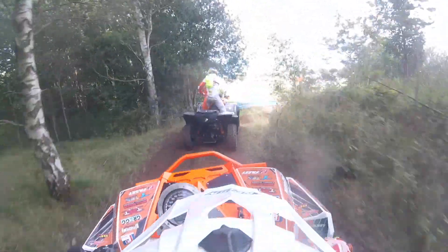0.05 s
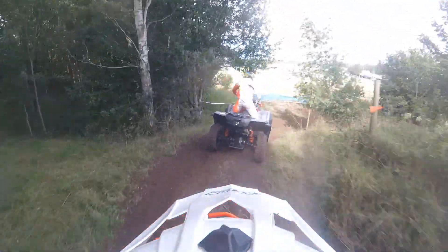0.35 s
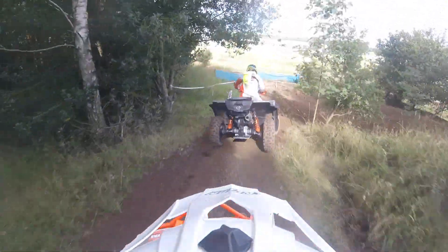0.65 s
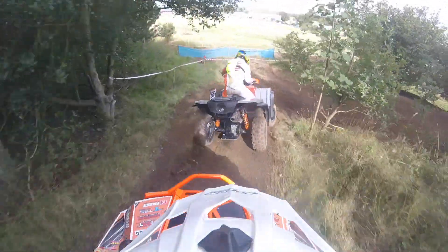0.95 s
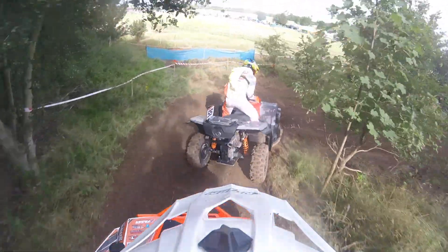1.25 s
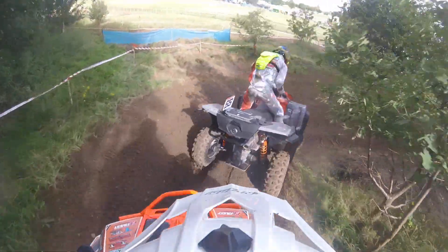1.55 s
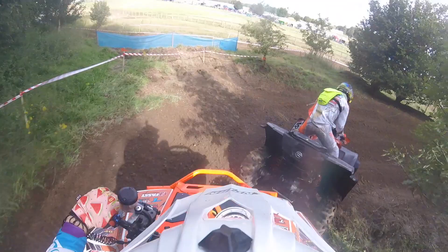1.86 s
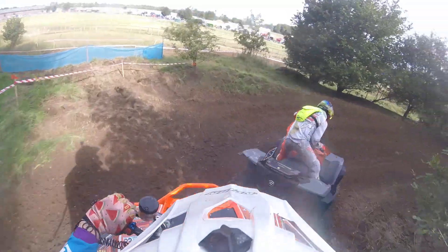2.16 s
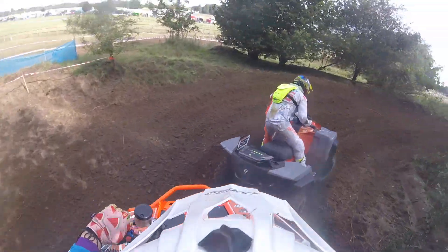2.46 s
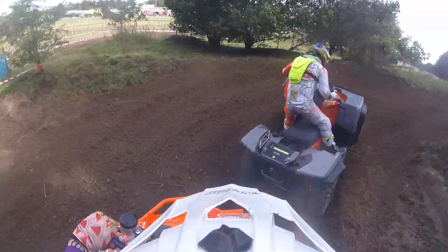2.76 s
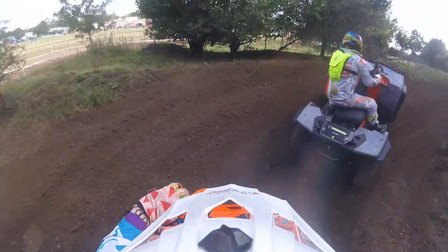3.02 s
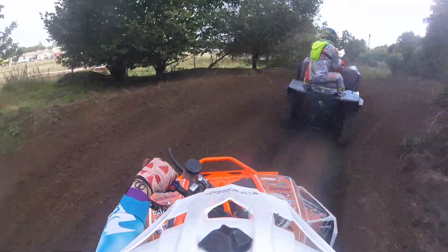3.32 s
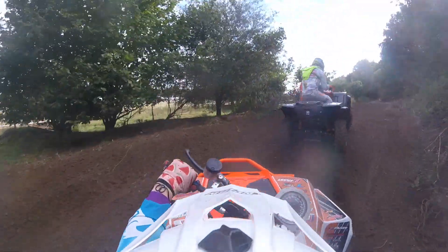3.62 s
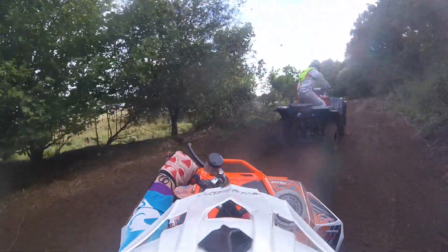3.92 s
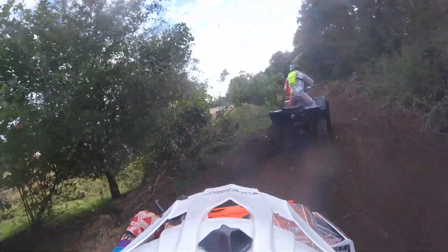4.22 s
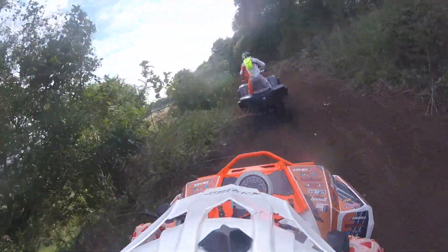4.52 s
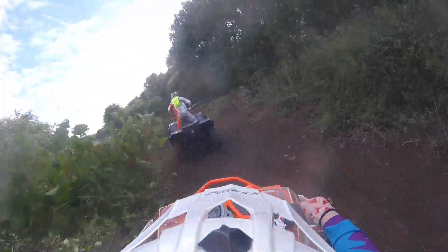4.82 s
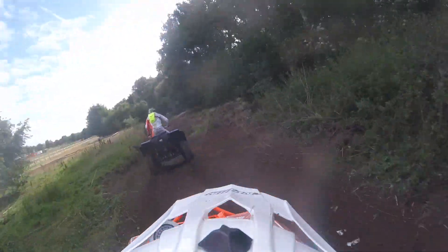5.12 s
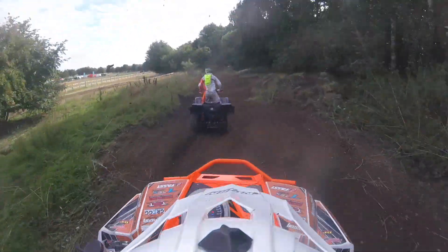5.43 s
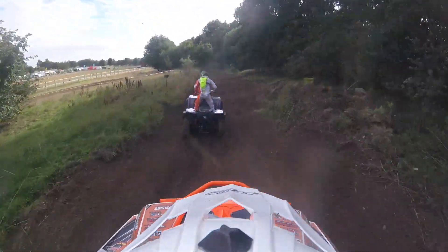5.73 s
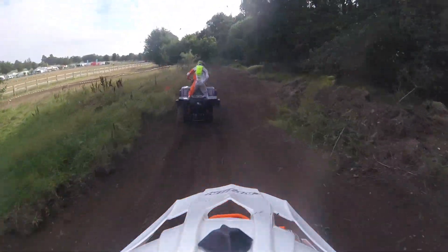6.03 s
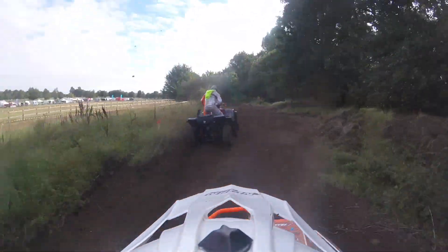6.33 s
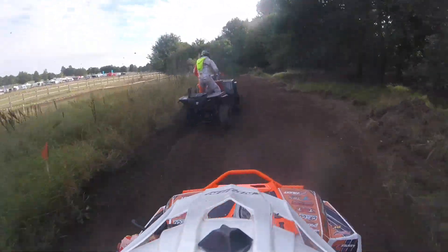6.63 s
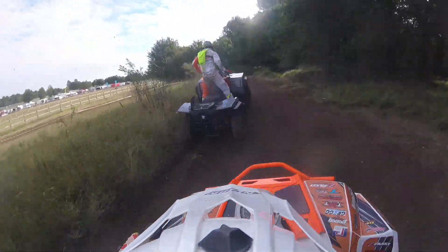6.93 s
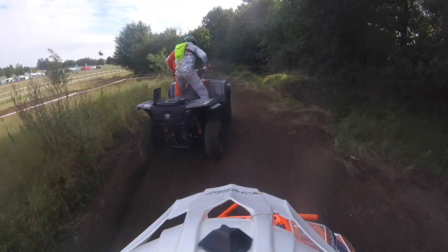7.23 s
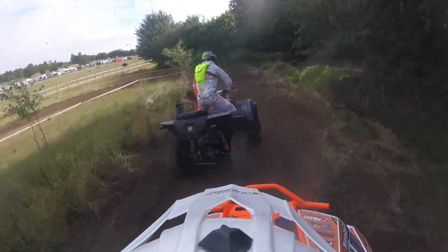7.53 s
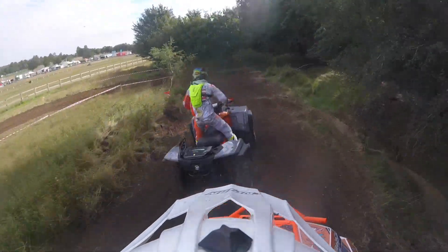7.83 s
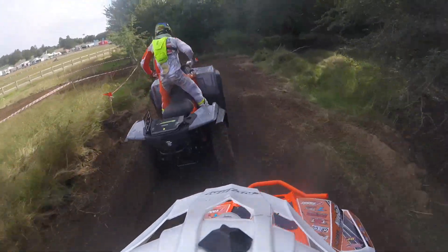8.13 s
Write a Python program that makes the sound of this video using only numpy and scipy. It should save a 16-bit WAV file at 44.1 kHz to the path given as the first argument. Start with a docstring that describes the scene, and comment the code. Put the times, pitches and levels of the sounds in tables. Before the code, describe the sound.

A quad bike's single-cylinder engine booms and rasps just below the rider's microphone on a dirt track, over low wind rumble and a hissy mechanical clatter. A faint gear whine fades at the very start. The engine revs briefly, then winds down from about 0.8 to 1.5 seconds as loose parts tick. Near 2 seconds the exhaust of a second quad just ahead sings a raspy rising note, then barks and roars loudly around 2.5 to 3 seconds. From 3 seconds the near engine holds a long pull, hardest around 4.5 seconds and growling at top speed near 6. From about 6 to 7.7 seconds the exhaust ahead cracks sharply and roars briefly again, while bumps clunk the chassis and tick loose parts. By 8 seconds the near engine has dropped to lower revs. The microphone's plastic housing makes everything slightly muffled, with a thin treble ring.

```python
"""A dirt track, from a camera microphone in a treble-ringing plastic housing on a quad bike's rider.
Over wind rumble and a brief gear whine, the single cylinder below booms and rasps, then winds down.
Near 2 s the tailpipe of a second quad just ahead sings, barks and roars. From 3 s the rider holds
a long pull, growling at top speed near 6 s. Then the pipe ahead cracks and roars again, bumps
clunk the chassis and tick loose parts, and by 8 s the near engine has dropped back."""
import sys
import numpy as np
from scipy import signal
from scipy.fft import rfft, irfft, next_fast_len
from scipy.io import wavfile
from scipy.ndimage import uniform_filter1d, map_coordinates

SR = 44100
rng = np.random.default_rng(int(sys.argv[2]) if len(sys.argv) > 2 else 0)


def waveform_to_disk(signal):
    """Save audio, clipped to [-1, 1], as 16-bit WAV at the path in sys.argv[1]."""
    frames = np.transpose(np.atleast_2d(signal))
    scaled = np.clip(frames, -1, 1) * 32767
    samples = np.round(scaled).astype(np.int16)
    wavfile.write(sys.argv[1], SR, samples)


N = 364707
TIME = np.arange(N) / SR


def amp(db):
    """Decibels to gain."""
    return 10 ** (np.asarray(db) / 20)


def unit(x):
    """Scale to rms 1."""
    return x / np.sqrt(np.mean(x ** 2) + 1e-20)


def steady(x, size=5000):
    """Hold the running rms at 1, whatever the pulse rate."""
    power = uniform_filter1d(uniform_filter1d(x * x, size), size)
    return x / np.sqrt(np.abs(power) + 1e-12)


def curve(rows):
    """Join (t/s, value) rows into one value per sample."""
    return np.interp(TIME, *np.transpose(rows))


def wobble(rate):
    """A smooth random curve, rate knots a second."""
    knots = rng.standard_normal(2048)
    coarse = TIME[::32]
    return np.interp(TIME, coarse, map_coordinates(knots, [coarse * rate], mode="wrap"))


def held(start, length, attack_s, release_s):
    """A gain that rises from start and dies away once its length is over."""
    age = TIME - start
    return np.clip(age / attack_s, 0, 1) * np.exp(-np.maximum(age - length, 0) / release_s)


def swells(rows, attack_s, release_s):
    """One gain curve per level column of (t/s, length/s, level/dB, ..) rows; the loudest row wins."""
    gains = 0
    for start, length, *db in rows:
        gains = np.maximum(gains, amp(db)[:, None] * held(start, length, attack_s, release_s))
    return gains


def ring(x, spectrum, size=8192):
    """Pass x through a minimum-phase body with the given (f/Hz, level/dB) response."""
    hz, db = np.transpose(spectrum)
    gain = amp(np.interp(np.log(np.fft.rfftfreq(size, 1 / SR) + 1), np.log(hz), db))
    cepstrum = irfft(np.log(gain))
    cepstrum[1:size // 2] *= 2
    cepstrum[size // 2 + 1:] = 0
    return signal.oaconvolve(x, irfft(np.exp(rfft(cepstrum))))[:N]


def pipe(x, round_trip_s, reflect):
    """Echoes between the ends of a pipe spread each pulse without colouring it."""
    size = next_fast_len(N + SR // 2)
    delay = np.exp(-2j * np.pi * np.fft.rfftfreq(size, 1 / SR) * round_trip_s)
    return irfft(rfft(x, size) * (delay - reflect) / (1 - reflect * delay), size)[:N]


def impulses(times, sizes):
    """Spikes of the given sizes at the given times."""
    return np.bincount(np.clip(np.round(times * SR).astype(int), 0, N), sizes, N + 1)[:N]


def firings(cycles, scatter_db, jitter_s):
    """One uneven pulse for each engine cycle."""
    times = np.interp(np.arange(np.ceil(cycles[0]), cycles[-1]), cycles, TIME)
    chance = rng.standard_normal((len(times), 2))
    return impulses(times + jitter_s * chance[:, 0], amp(scatter_db * chance[:, 1]))


def puffs(spikes, decay_s, click=0):
    """Each spike releases a dying puff of turbulence, led by an optional sharp click."""
    envelope = signal.lfilter([1], [1, -np.exp(-1 / (decay_s * SR))], spikes)
    return click * spikes + envelope * rng.standard_normal(N)


def orders(cycles, table, flutter_db, count=4):
    """Orders (multiples of the cycle rate), wavering in level, phased into count pulses a cycle."""
    tone = 0
    for k, db in table:
        phase = 2 * np.pi * k * cycles - np.pi * k * k / count
        tone += amp(db + flutter_db * wobble(12)) * np.cos(phase)
    return unit(tone)


# rumble at the microphone: f/Hz, level/dB
RUMBLE_SPECTRUM = [(10, -26.5), (25, -18), (45, -6), (80, -7.5), (150, -6.5), (250, -12.5), (500, -24),
                   (1500, -45)]
# its course along the track: t/s, relative level/dB
RUMBLE_COURSE = [(0.0, -30), (0.04, -36), (1.2, -38), (1.55, -33), (2.0, -42), (2.7, -41), (3.0, -37),
                 (3.84, -43), (5.11, -35), (6.01, -39), (7.07, -31), (7.23, -41), (7.76, -35), (7.85, -43),
                 (8.22, -32), (8.27, -36)]
def wind_and_ground():
    """Wind and bumps rumble in lumps."""
    gain = amp(curve(RUMBLE_COURSE) + 8.5 + 2.5 * wobble(22))
    return gain * unit(ring(rng.standard_normal(N), RUMBLE_SPECTRUM))


# gear tones: multiple of the mesh pitch, level/dB
WHINE_ORDERS = [(7, -14), (8, -11), (9, -4.5), (10, -1.5), (11, -11)]
def gear_whine():
    """Meshing gears give a faint, slowly rising whine that soon dies away."""
    mesh_hz = 194.3 + 21 * TIME
    gain = amp(-39.5) * held(0, 0.22, attack_s=0.006, release_s=0.15)
    return gain * orders(np.cumsum(mesh_hz) / SR, WHINE_ORDERS, flutter_db=7.5)


# colour of ticks and tailpipe cracks: f/Hz, level/dB
SNAP_SPECTRUM = [(100, -8), (300, -8.5), (600, 0.5), (900, -3), (1500, -2), (2100, -2.5), (2700, -1.5),
                 (3500, -4.5), (5000, 0), (9000, -9)]
def snaps(spikes, decay_s, click):
    """Each spike is a bright click with a short noisy tail."""
    return ring(puffs(spikes, decay_s, click), SNAP_SPECTRUM)


# sharp ticks, the last two being cracks from the pipe ahead: t/s, relative level/dB
SHARP_TICKS = [(0.2872, -19.5), (.367, -19), (1.2162, -26), (1.2329, -27), (1.278, -21), (1.3231, -21),
               (1.3687, -26.5), (1.5147, -24.5), (1.5935, -22), (2.277, -23), (2.297, -21), (2.34, -18.5),
               (2.5083, -17.5), (5.837, -21.5), (6.167, -45), (7.418, -22.5), (7.635, -14.5),
               (7.6703, -24.5), (7.697, -13), (7.7135, -13.5)]
def sharp_ticks():
    """Sharp ticks: at low revs near 1.2-1.4 s the chain slaps once per firing of the near engine. Most other
    ticks fall on bumps; the last two, near 7.7 s, are cracks from the tailpipe ahead."""
    times, db = np.transpose(SHARP_TICKS)
    return snaps(impulses(times, amp(db + 6)), decay_s=0.0026, click=3)


# clunks under the rider: t/s, f/Hz, relative level/dB, t60/s
CHASSIS_CLUNKS = [(5.876, 710, -7, 0.011), (6.424, 880, -14.5, 0.03), (6.857, 617, -11.5, 0.017),
                  (6.886, 612, -19, 0.014), (6.902, 760, -13.5, 0.024), (6.9134, 2650, -14.5, 0.054),
                  (6.939, 570, -11.5, .022), (7.618, 360, -11, 0.062), (7.634, 404, -20.5, .04),
                  (7.644, 362, -15, .05), (7.671, 374, -17, .05), (7.697, 369, -11, 0.033),
                  (7.714, 378, -16, .055)]
def chassis():
    """Each bump rings a panel briefly, with two weaker modes around the main one."""
    t = np.arange(SR // 10) / SR
    out = np.zeros(N)
    for start, hz, db, t60 in CHASSIS_CLUNKS:
        phase = 2 * np.pi * hz * t
        modes = np.sin(phase) + .5 * np.sin(0.92 * phase) + 0.37 * np.sin(1.1 * phase)
        out[round(start * SR):][:len(t)] -= amp(db - 5 - 60 * t / t60) * modes
    return out


# note of the pipe ahead: order, level/dB
SONG_ORDERS = [(2, -1), (5, -5), (6, -7.5), (8, -10), (10, -2.5), (11, -4), (12, -12), (14, -16),
               (15, -4.5), (16, -6.5), (17, -21.5), (25, -16), (26, -14), (27, -20.5)]
# when it sings: t/s, length/s, level/dB
SONG_SPANS = [(1.74, 0.25, -22), (2.0, 0.48, -29.5)]
def tailpipe_song(cycles):
    """On hard pulls a few orders sing out in a raspy note that swells, climbs and fades."""
    gain, = swells(SONG_SPANS, attack_s=0.11, release_s=0.1)
    return gain * orders(cycles + .004 * wobble(70), SONG_ORDERS, flutter_db=2.5)


# full throttle ahead: t/s, length/s, body level/dB, blare level/dB, spit level/dB
ROAR_SPANS = [(2.49, 0.37, -19, -26, -21.5), (7.04, 0.13, -29, -26.5, -45)]
# the pressure pulse, its bright edge and its spit of gas: f/Hz, level/dB
BODY_SPECTRUM = [(20, -21), (45, -10.5), (90, 1), (135, 7), (185, -14), (280, 0.5), (380, -1.5),
                 (480, -11.5), (700, -26.5), (2000, -58.5)]
BLARE_SPECTRUM = [(300, -28.5), (520, -5), (600, 13), (700, -9), (780, 0), (880, 6.5), (1000, -2.5),
                  (1120, -10), (1800, -2), (2500, -10.5), (4000, -15), (9000, -33)]
SPIT_SPECTRUM = [(200, -37), (900, -6.5), (2400, 0), (5000, -2), (9000, 1)]
def tailpipe_roar(cycles):
    """The valve spits, then a steep pulse runs down the pipe and returns inverted from the open end."""
    body_gain, _, spit_gain = swells(ROAR_SPANS, attack_s=0.014, release_s=0.07)
    _, blare_gain, _ = swells(ROAR_SPANS, attack_s=0.31, release_s=0.07)  # the blare builds slowly
    front = firings(cycles - .27, scatter_db=.5, jitter_s=.00002)
    wave = front - .75 * np.interp(TIME - .0048, TIME, front)
    valve = firings(cycles, scatter_db=1.5, jitter_s=.0002)
    valve += firings(cycles - .36, scatter_db=1.5, jitter_s=.0003)
    body = steady(ring(wave, BODY_SPECTRUM))
    spit = steady(ring(puffs(valve, decay_s=0.0036, click=2.5), SPIT_SPECTRUM))
    blare = steady(ring(wave + .012 * puffs(front, decay_s=.003), BLARE_SPECTRUM))
    return body_gain * body + blare_gain * blare + np.hypot(spit_gain, 1.3 * blare_gain) * spit


# runs of cracks as the throttle ahead snaps open: t/s, length/s, relative level/dB
CRACK_RUNS = [(.268, .07, -23.5), (.672, .01, -23), (2.509, .01, -17), (5.8755, .005, -16),
              (5.893, .04, -12.5), (6.424, .01, -26), (6.5315, .01, -10), (6.563, .05, -10.5),
              (6.625, .05, -18.5), (6.857, .005, -16), (6.876, .012, -8.5), (6.904, .04, -7),
              (6.956, .04, -17.5), (7.085, .12, -22), (7.608, .01, -13), (7.635, .005, -11)]
# their hollow knock of pressure: f/Hz, level/dB
KNOCK_SPECTRUM = [(60, -17.5), (130, -10.5), (200, -17.5), (300, -8), (400, -7.5), (600, 2), (850, 2.5),
                  (1400, -27), (2600, -1.5), (9000, -6.5)]
def tailpipe_cracks(cycles):
    """Under sudden load a cycle cracks twice: as the valve opens, then as the piston drives gas out."""
    spikes = np.zeros(N)
    for start, length, db in CRACK_RUNS:
        first, last = np.interp([start, start + length], TIME, cycles)
        openings = np.arange(first, last)
        scatter = amp(1.3 * rng.standard_normal((len(openings), 2)))
        spikes += impulses(np.interp(openings, cycles, TIME), amp(db) * scatter[:, 0])
        spikes += impulses(np.interp(openings + .38, cycles, TIME), amp(db - 2) * scatter[:, 1])
    knock = ring(pipe(spikes, round_trip_s=.0024, reflect=0.51), KNOCK_SPECTRUM)
    spit = snaps(spikes, decay_s=0.0015, click=4)
    return 10 * knock + 1.8 * spit


# firing rate of the quad ahead: t/s, f/Hz
AHEAD_RATE = [(0.0, 40.5), (0.16, 46), (0.53, 44), (0.92, 42.6), (1.22, 36.0), (1.56, 26.6), (1.7, 30.4),
              (1.83, 30.9), (1.9, 31.5), (2.09, 34.6), (2.25, 35.4), (2.46, 33.3), (2.6, 42.3), (2.9, 50.2),
              (3.06, 42.5), (3.25, 39.7), (3.57, 45.1), (4.91, 42.4), (5.04, 46.0), (5.41, 42.6),
              (5.96, 34.4), (6.73, 29.8), (7.21, 48.6), (7.46, 31.8), (7.69, 35.2), (7.97, 28.5),
              (8.27, 29.7)]
# blips of its throttle: t/s, length/s, bark level/dB, thud level/dB
AHEAD_BLIPS = [(.22, 0.55, -44, -25.5), (1.68, 0.78, -33, -27.5), (2.12, 0.29, -38.5, -22),
               (2.92, 0.49, -28.5, -24), (5.18, 0.23, -26, -28.5), (5.84, 0.037, -35, -35),
               (6.51, 0.15, -32, -33.5), (6.85, 0.22, -36, -37), (7.06, 0.17, -30.5, -43),
               (7.57, 0.12, -34, -30.5), (7.97, 0.11, -41.5, -40)]
# its thud and bark, heard from behind: f/Hz, level/dB
AHEAD_THUD_SPECTRUM = [(20, -16.5), (45, -19.5), (85, -2.5), (130, -0.5), (190, -9), (260, -13.5),
                       (500, -51.5)]
BARK_SPECTRUM = [(120, -46.5), (230, -4.5), (300, 6.5), (350, 9), (420, 2.5), (500, -1.5), (600, -9),
                 (740, -19.5), (930, -11.5), (1300, -16.5), (2400, -19), (8000, -27.5)]
def quad_ahead():
    """Just ahead, a tailpipe points back at the microphone; each blip swells its thud and bark."""
    bark_gain, thud_gain = swells(AHEAD_BLIPS, attack_s=0.031, release_s=0.034)
    bark_gain = np.hypot(bark_gain, amp(-46.5))  # both carry on softly between blips
    thud_gain = np.hypot(thud_gain, amp(-36))
    cycles = np.cumsum(curve(AHEAD_RATE)) / SR
    cycles -= np.interp(CRACK_RUNS[0][0], TIME, cycles)  # a firing falls on the first crack
    pulses = firings(cycles, scatter_db=.7, jitter_s=.00003)
    thud = steady(ring(pipe(pulses, round_trip_s=.0105, reflect=0.47), AHEAD_THUD_SPECTRUM))
    bark = steady(ring(pipe(pulses, round_trip_s=.0058, reflect=0.66), BARK_SPECTRUM))
    return (thud_gain * thud + bark_gain * bark
            + tailpipe_song(cycles) + tailpipe_roar(cycles) + tailpipe_cracks(cycles))


# the loose panel's resonance: f/Hz, level/dB
PANEL_SPECTRUM = [(1100, -45), (1740, -3), (1890, -12), (2040, -21.5), (2600, -12), (3500, -35.5)]
# when it buzzes: t/s, length/s, level/dB
BUZZ_SPANS = [(.24, 0.2, -43), (.62, 0.045, -38.5), (2.8, 0.15, -33.5)]
def panel_buzz(pulses):
    """Each firing shakes a loose panel on the rider's quad."""
    gain, = swells(BUZZ_SPANS, attack_s=0.041, release_s=0.073)
    return gain * steady(ring(pipe(pulses, round_trip_s=0.011, reflect=0.8), PANEL_SPECTRUM))


# valves, chain and tyres below the microphone: f/Hz, level/dB
CLATTER_SPECTRUM = [(100, -40.5), (300, 6), (600, 5), (1100, 2.5), (1800, 0.5), (2600, 0), (5000, -1.5),
                    (9000, -2.5)]
# their course along the track: t/s, relative level/dB
CLATTER_COURSE = [(0.0, -36), (0.23, -37.5), (0.94, -42.5), (1.5, -44.5), (1.77, -36), (2.35, -42.5),
                  (2.6, -37), (2.8, -33), (3.09, -34), (5.11, -36), (5.34, -34), (5.46, -37), (6.59, -41.5),
                  (6.68, -47), (6.91, -40.5), (7.02, -35), (7.39, -43), (8.27, -40)]
def clatter(cycles, pulses):
    """Valves clatter in two bunches a cycle, over a hiss of chain and tyres."""
    strikes = firings(2 * cycles, scatter_db=1.3, jitter_s=.001) + .7 * pulses
    bunches = steady(puffs(strikes, decay_s=.0045))
    hiss = .95 * rng.standard_normal(N)
    gain = amp(curve(CLATTER_COURSE) + 7 + 1.1 * wobble(14))
    return gain * unit(ring(bunches + hiss, CLATTER_SPECTRUM))


# drone of the near engine: order, level/dB
DRONE_ORDERS = [(2, -3), (3, 1.5), (5, -12), (7, -11), (8, -1.5), (10, -19)]
# when it winds down: t/s, length/s, level/dB
OVERRUN_SPANS = [(.8, 0.62, -28), (7.75, 0.23, -36)]
def overrun(cycles):
    """With the throttle shut the engine sinks in a clean drone."""
    gain, = swells(OVERRUN_SPANS, attack_s=0.17, release_s=0.11)
    return gain * orders(cycles, DRONE_ORDERS, flutter_db=0)


# growl of the near exhaust: order, level/dB
GROWL_ORDERS = [(11, -1), (12, -0.5), (13, 4), (14, -9), (15, -4.5), (16, 5), (17, -6), (18, -3), (19, -8),
                (21, -4)]
def exhaust_growl(cycles, rate, opening):
    """Near top speed, while the throttle is open, the exhaust adds a cluster of higher orders."""
    full_hz, fade_db_per_hz = 46.8, 0.5
    gain = opening * amp(-38.5 - fade_db_per_hz * np.maximum(full_hz - rate, 0))
    return gain * orders(cycles + .0025 * wobble(45), GROWL_ORDERS, flutter_db=3, count=2)


# rasp of the near exhaust and breathy rush of the intake: f/Hz, level/dB
RASP_SPECTRUM = [(150, -37), (300, -2), (420, -3), (520, -2.5), (620, -11.5), (750, -2.5), (1100, -16.5),
                 (2500, -13.5), (6000, -52)]
RUSH_SPECTRUM = [(200, -36), (450, -1.5), (700, -2), (1100, -2), (2000, -18.5)]
# tones that stand out of the rasp: order, level/dB
SNARL_ORDERS = [(8, -2), (9, -8.5), (11, -1.5), (13, -5.5), (14, -4.5), (15, -3), (18, -3.5), (19, -7)]
def exhaust_rasp(cycles, pulses):
    """Gas leaves twice a cycle: as the valve opens, and more weakly half a cycle later."""
    exhaust = pulses + 0.4 * firings(cycles + .5, scatter_db=2, jitter_s=.00015)
    gas = steady(pipe(exhaust, round_trip_s=.0045, reflect=0.44))
    grit = amp(-7) * steady(puffs(exhaust, decay_s=0.0056))
    rasp = steady(ring(gas + grit, RASP_SPECTRUM))
    crank = cycles + .005 * wobble(45)  # uneven running roughens the higher orders
    snarl = amp(-1) * orders(crank, SNARL_ORDERS, flutter_db=3, count=2)
    rush = amp(-10.5) * steady(ring(puffs(exhaust, decay_s=0.0081), RUSH_SPECTRUM))
    return amp(-2.5 + 0.59 * wobble(12)) * (rasp + snarl + rush)


# boom of the near engine: order, level/dB
BOOM_ORDERS = [(4, -33.5), (5, 2), (6, -1.5), (7, -17), (8, -13.5), (9, -17.5), (10, -8.5), (11, -13)]
# the airbox resonance: f/Hz, level/dB
AIRBOX_SPECTRUM = [(110, -0.5), (145, -1), (195, 2), (240, -2.5), (300, -6.5), (390, 1), (480, -4.5)]
def airbox_boom(cycles, rate):
    """A few orders, coloured by the airbox, swell together after each firing and waver with the crank."""
    crank = cycles + .003 * wobble(50)
    boom = 0
    for k, db in BOOM_ORDERS:
        airbox_db = np.interp(k * rate, *np.transpose(AIRBOX_SPECTRUM))
        boom += amp(db + airbox_db + 1.6 * wobble(12)) * np.cos(2 * np.pi * k * crank)
    return unit(boom)


# firing rate of the rider's quad: t/s, f/Hz
NEAR_RATE = [(0.0, 30.9), (0.16, 28.2), (0.27, 30.8), (0.44, 36.8), (0.55, 35.8), (0.94, 26.3), (1.2, 22.3),
             (1.36, 21.6), (1.58, 19.8), (1.68, 23.2), (1.77, 28), (2.07, 30), (2.25, 34.5), (2.42, 38.5),
             (2.58, 32.8), (2.9, 28.4), (3.25, 35.6), (3.5, 39.1), (4.1, 38.8), (4.38, 40.6), (4.58, 43.4),
             (4.7, 41.6), (4.84, 43.1), (5.04, 40.6), (5.46, 43.0), (5.67, 38.2), (6.13, 49.2),
             (6.29, 44.9), (6.47, 46.0), (6.68, 45.0), (6.86, 36.6), (7.16, 29.5), (7.71, 34.7),
             (8.11, 27.3), (8.27, 30.1)]
# pulls on its throttle: t/s, length/s, then relative level/dB of boom, rasp and thud
THROTTLE_PULLS = [(.06, 0.44, -18.5, -34, -33.5), (0.56, 0.23, -28, -50, -34),
                  (1.55, 0.14, -20.5, -31, -47), (2.169, 0.35, -26, -36, -28),
                  (3.016, 2.53, -20, -35, -34.5), (4.297, 0.28, -18.5, -27, -23.5),
                  (5.532, 1.11, -22, -36, -35), (7.364, 0.27, -25.5, -36.5, -48),
                  (8.08, 0.27, -29, -49, -52)]
# low thud of its firings: f/Hz, level/dB
NEAR_THUD_SPECTRUM = [(20, -30), (40, -24.5), (70, 9.5), (90, 1), (125, -2), (170, -9), (300, -57)]
def near_engine():
    """One cylinder fires just below the microphone; throttle and speed set its boom, rasp and thud."""
    open_s, shut_s, cruise_hz = 0.11, 0.078, 42.96
    rate = curve(NEAR_RATE)
    octaves = np.log2(rate / cruise_hz)
    opening = np.max([held(start, length, open_s, shut_s) for start, length, *_ in THROTTLE_PULLS], 0)
    boom_gain, rasp_gain, thud_gain = swells(THROTTLE_PULLS, open_s, shut_s)
    # each keeps a coasting level with the throttle shut
    boom_gain = np.hypot(boom_gain, amp(-31.5))
    rasp_gain = np.hypot(rasp_gain, amp(-43.5))
    thud_gain = np.hypot(thud_gain, amp(-33 - 2 * octaves))
    boom_gain *= amp(-np.maximum(rate - cruise_hz, 0))  # 1 dB lost per Hz as it outruns the airbox
    rasp_gain *= amp(7.5 * octaves)  # harder with speed
    cycles = np.cumsum(rate * (1 + .002 * wobble(25))) / SR
    boom = airbox_boom(cycles, rate)
    pulses = firings(cycles, scatter_db=1, jitter_s=.00005)
    thud = steady(ring(pulses, NEAR_THUD_SPECTRUM))
    rasp = exhaust_rasp(cycles, pulses)
    return (boom_gain * boom + thud_gain * thud + rasp_gain * rasp + clatter(cycles, pulses)
            + exhaust_growl(cycles, rate, opening) + overrun(cycles) + panel_buzz(pulses))


def scene():
    """Both quads and the rough track, in mono from the rider's seat."""
    return (near_engine() + gear_whine() + quad_ahead() + wind_and_ground()
            + sharp_ticks() + chassis())[None]


# the plastic housing around the microphone: f/Hz, level/dB
HOUSING_SPECTRUM = [(6, -28), (25, 5), (60, 0.5), (2500, -2.5), (3100, -14), (4100, -21.5), (4600, -18),
                    (5300, -8), (6100, -5.5), (6520, 6), (7000, -4.5), (8000, -16), (9000, -36)]
def record(dry):
    """The housing muffles the upper mids and rings in the treble; peaks are rounded, the top is cut."""
    ceiling, top_hz = .48, 9270
    boxed = ring(dry[0], HOUSING_SPECTRUM)
    rounded = boxed / (1 + np.abs(boxed / ceiling) ** 6) ** (1 / 6)
    size = next_fast_len(N + SR // 2)
    passband = np.fft.rfftfreq(size, 1 / SR) < top_hz
    return irfft(rfft(rounded, size) * passband, size)[None, :N]


dry = scene()
out = record(dry)
waveform_to_disk(out)
```